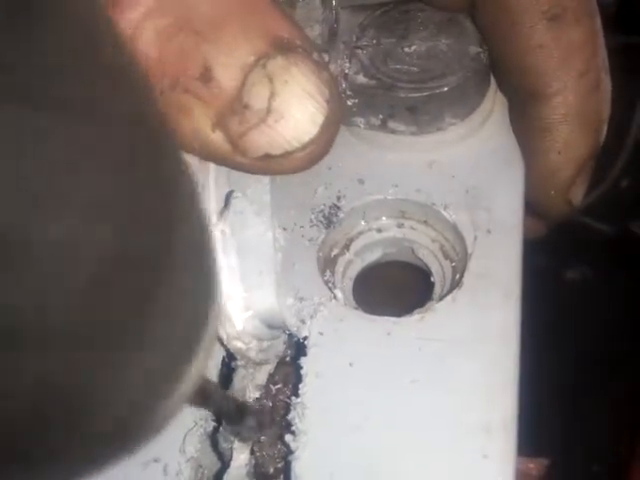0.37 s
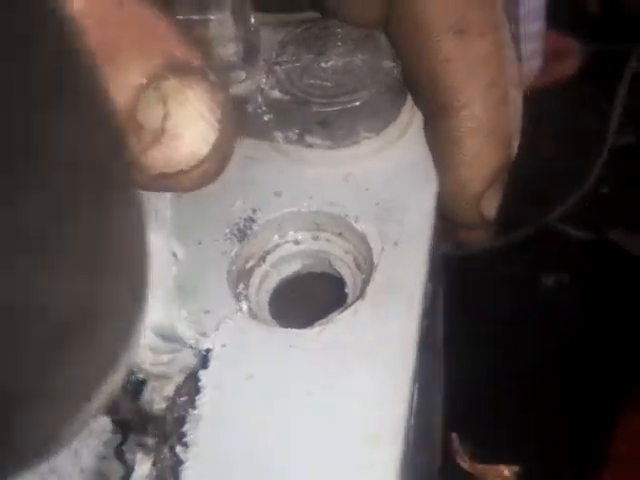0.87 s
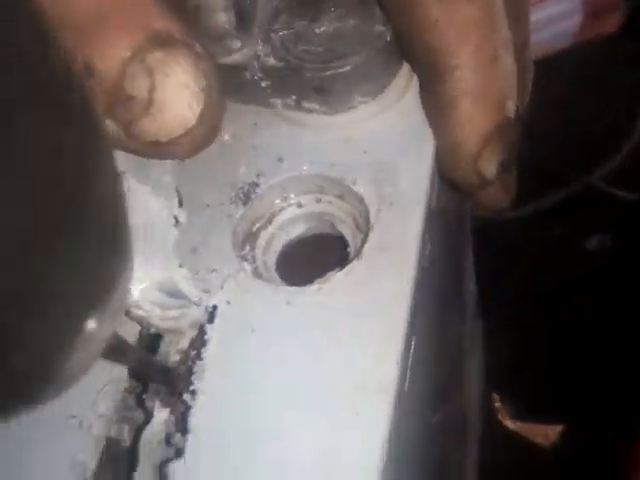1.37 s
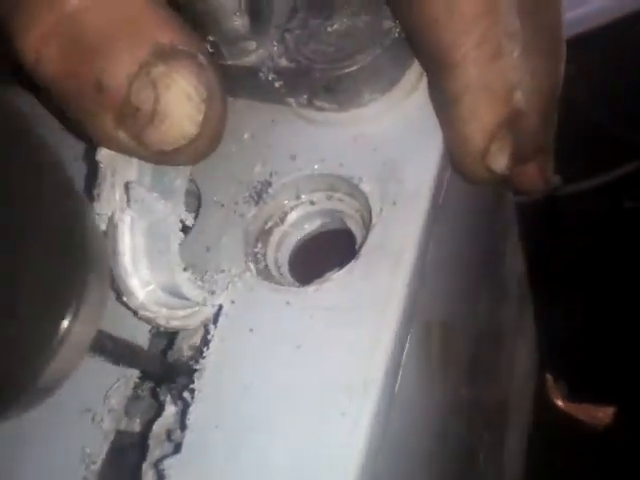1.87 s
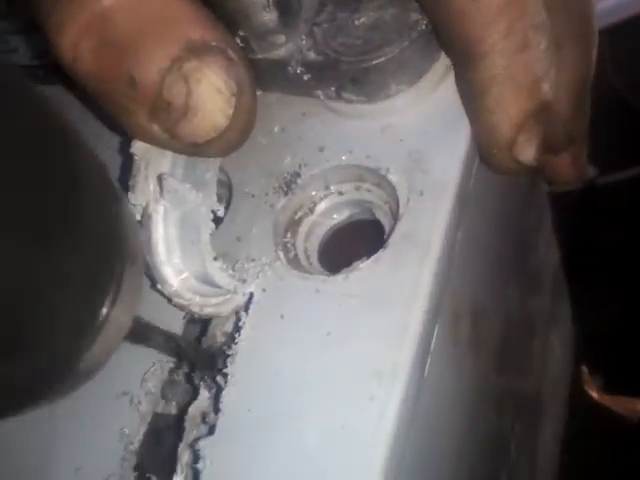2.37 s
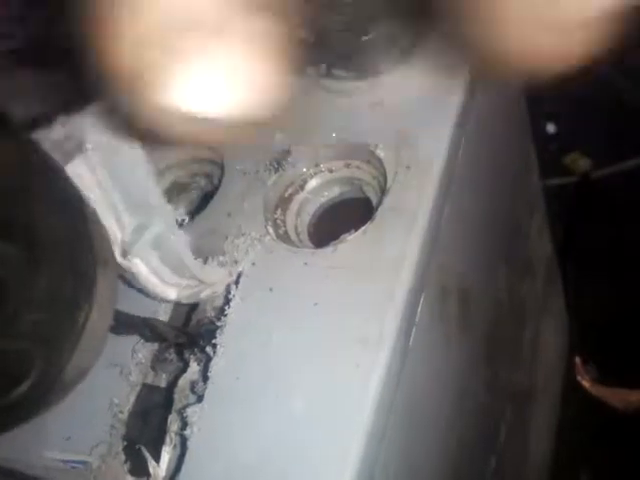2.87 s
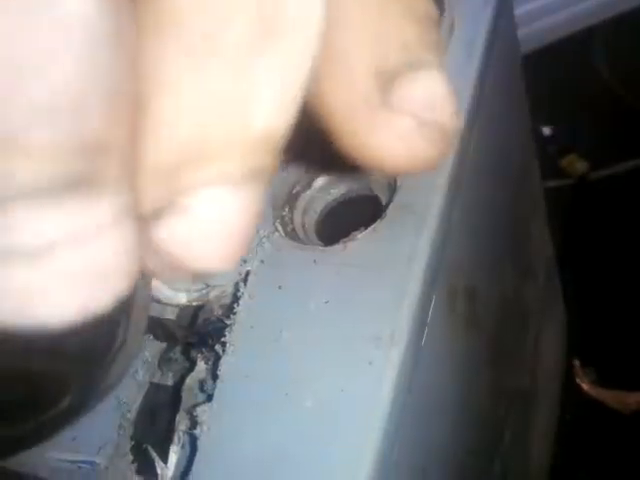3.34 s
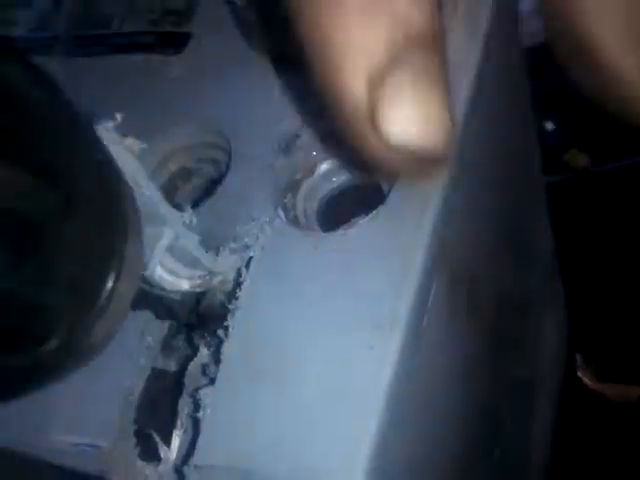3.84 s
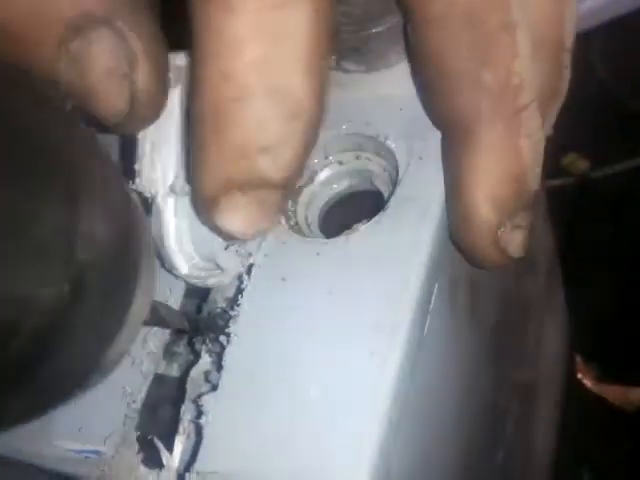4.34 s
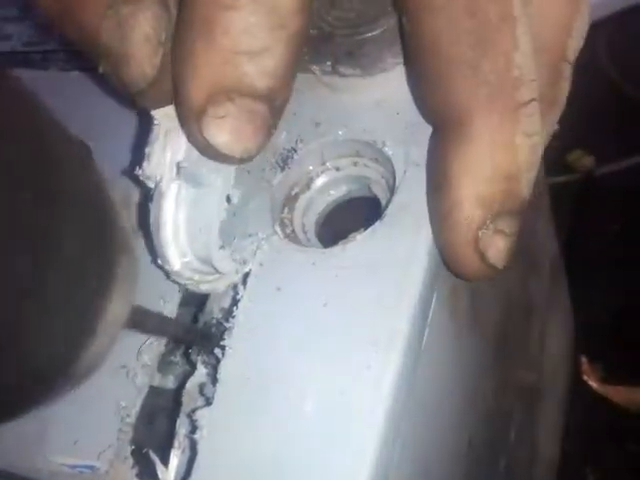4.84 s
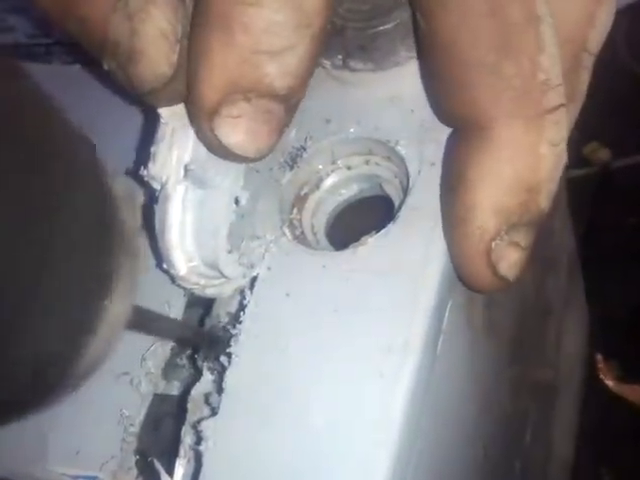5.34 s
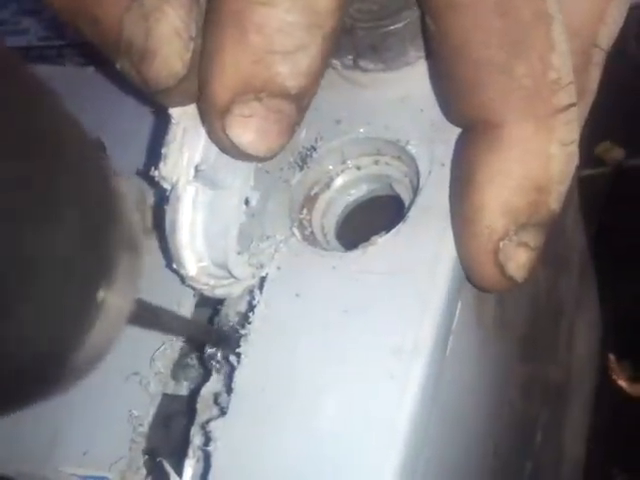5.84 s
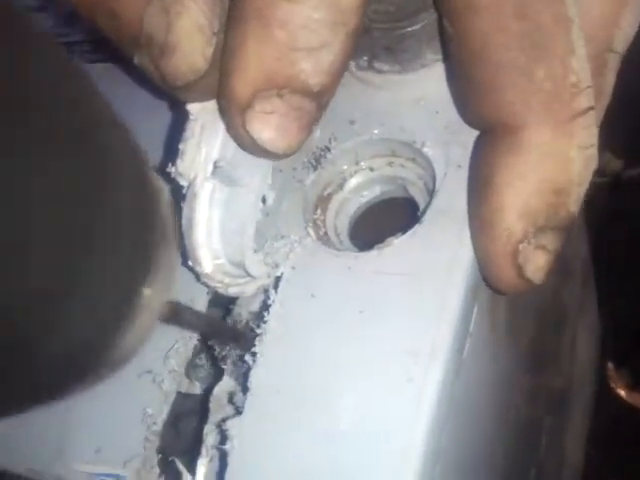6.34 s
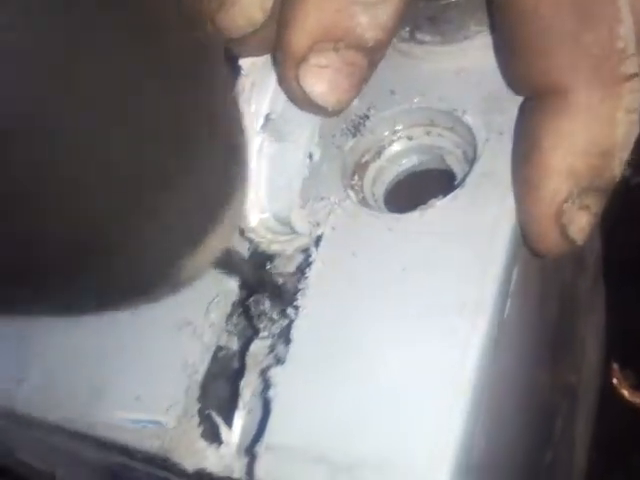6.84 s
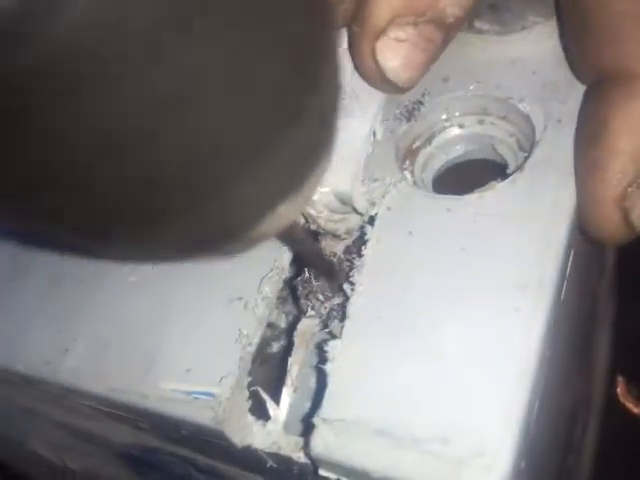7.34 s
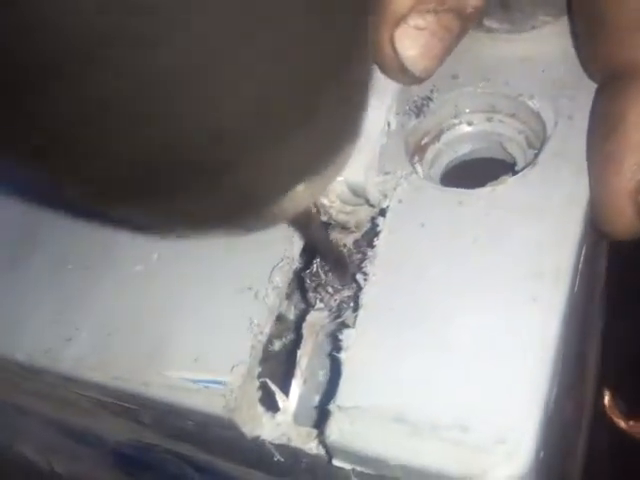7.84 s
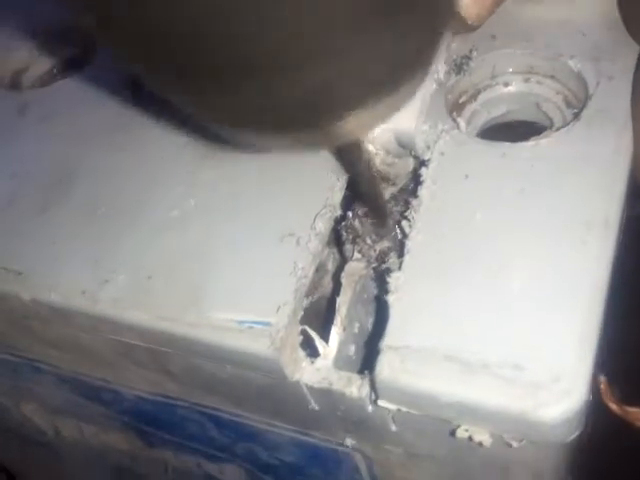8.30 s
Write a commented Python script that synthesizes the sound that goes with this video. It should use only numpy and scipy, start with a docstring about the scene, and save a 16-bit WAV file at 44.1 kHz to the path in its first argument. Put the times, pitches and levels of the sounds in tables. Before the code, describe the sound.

A cordless drill grinds into soft metal at moderate speed, pauses amid clicks and rubbing, bursts briefly, then runs long at full whining speed.

```python
"""A cordless drill bores into soft lead close to a small mono microphone, slowly at first, while a low
shudder of dense thumps arrives three times. In the pause the trigger and case click and rub: struck modes
and grainy noise. A short burst is stopped by the brake, then after more clicks comes a long run at full
speed, leaning ever further over the microphone. Rotor speed drives the drill's tones and noise; its
sound and the handling carry a little room, over a faint steady hiss."""
import sys
import numpy as np
from scipy import signal
from scipy.fft import rfft, irfft, next_fast_len
from scipy.io import wavfile
from scipy.ndimage import uniform_filter1d

SR = 44100
rng = np.random.default_rng(int(sys.argv[2]) if len(sys.argv) > 2 else 0)


def gain_from_db(level_db):
    """Convert decibel levels to linear amplitude factors (20 dB per decade)."""
    decades = np.asarray(level_db, float) / 20
    return 10 ** decades


def unload_audio(sound):
    """Save the sound as a 16-bit wav file, at the path given as the first command line argument."""
    columns = np.transpose(np.atleast_2d(sound))
    # keep every value between -1 and 1, then stretch to whole-number steps
    steps = np.round(np.clip(columns, -1, 1) * 32767)
    wavfile.write(sys.argv[1], SR, steps.astype(np.int16))


N = 383229
SEGMENTS = 15  # commutator whine cycles per shaft turn

# how far the drill leans over the microphone [t/s, lean 0-1]
LEAN = [(6, 0.16), (6.6, 0.27), (7.2, 0.54), (8.69, 0.97)]


def evened(x):
    """Scales to rms 1."""
    return x / np.sqrt(np.mean(x ** 2) + 1e-20)


def read(points, hz):
    """Reads a spectrum on a log-frequency axis."""
    f, value = np.transpose(points)
    return np.interp(np.log(hz + 1), np.log(f + 1), value)


def curves(tables, off):
    """Joins timed tables into full-length columns that hold the value off outside them."""
    t = np.arange(N) / SR
    out = np.full((len(tables[0][0]) - 1, N), float(off))
    for rows in tables:
        s, *columns = np.transpose(rows)
        inside = (t >= s[0]) & (t <= s[-1])
        out[:, inside] = [np.interp(t[inside], s, c) for c in columns]
    return out


def coloured(x, points):
    """Filters by a spectrum table [f/Hz, level/dB]."""
    size = next_fast_len(len(x))
    gain = gain_from_db(read(points, np.fft.rfftfreq(size, 1 / SR)))
    return irfft(rfft(x, size) * gain, size)[:len(x)]


def drift(hz):
    """Slow random wander of rms 1: noise through a one-pole low-pass at hz."""
    knots = rng.standard_normal(N // 64 + 2)
    slow = signal.lfilter([1], [1, -np.exp(-2 * np.pi * hz * 64 / SR)], knots)
    return np.interp(np.arange(N) / 64, np.arange(len(slow)), evened(slow))


def tone(turns, blur_hz):
    """A sine of rms 1 whose phase wanders at random, which widens the line to blur_hz."""
    wander = np.cumsum(rng.standard_normal(N)) * np.sqrt(2 * np.pi * abs(blur_hz) / SR)
    return np.sqrt(2) * np.sin(2 * np.pi * turns + wander)


def drill():
    """The rotor lags behind the trigger; its speed drives every tone, the noise level and its colour."""
    # what the rotor heads for, one table a pull of the trigger [t/s, whine f/Hz]
    pulls = [
        [(0.0, 3850), (0.46, 3808), (1.0, 3792), (1.46, 3686), (1.9, 3700), (2.1, 3660), (2.615, 3715)],
        [(4.007, 5200), (4.215, 5105), (4.435, 3130)],
        [(4.626, 5176), (4.8, 5180), (4.82, 5013), (5.4, 4986), (6.5, 4968), (7.65, 4950), (8.69, 4922)],
    ]
    # pressure on the bit, as roar above its level at that speed [t/s, level/dB]
    load = [(0, 0), (.8, 0.5), (1.2, 1.1), (1.6, 0.2), (2.6, 0.5), (4.2, 0.5), (4.95, -0.8), (5.2, 0.05),
            (5.84, 0.5), (7.14, 0.74), (8.69, 0.5)]
    # noise by speed [whine f/Hz, gearbox roar level/dB, cutting hiss re roar/dB, fan hiss re roar/dB]
    noise_by_speed = [(0, -44, -17.5, -23), (800, -40, -18.5, -19.5), (3960, -36.5, -8.5, -12),
                      (4590, -32.5, -11, -9.5), (4974, -31.5, -9, -9)]
    # the brake bites as each of the first two pulls ends [jolt level/dB, rattle level/dB]
    brakes = [(-43, -51.5), (-23.5, -50)]
    rotor_lag_s = .055  # time constant
    settled_hz = 300  # low-speed tones sound only while the whine is this near its goal
    jolt_rise_s, jolt_db_per_s, rattle_db_per_s = 0.0097, 900, 120
    lean_cut_db, lean_fan_db = 5, -4.5  # leaning shows more of the cut and less of the fan

    t = np.arange(N) / SR
    goal_hz = curves(pulls, 0)[0]
    keep = np.exp(-1 / (rotor_lag_s * SR))
    whine_hz = signal.lfilter([1 - keep], [1, -keep], goal_hz, zi=[keep * goal_hz[0]])[0]
    powered = 1. * (goal_hz > 0)
    shaft_hz = whine_hz / SEGMENTS
    shaft = np.cumsum(shaft_hz) / SR  # turns so far
    fast = powered * np.clip((shaft_hz - 255) / 70, 0, 1)
    settled = np.clip(1 - abs(goal_hz - whine_hz) / settled_hz, 0, 1)

    speeds, *columns = np.transpose(noise_by_speed)
    roar_db, cut_db, fan_db = [np.interp(whine_hz, speeds, c) for c in columns]
    level = powered * gain_from_db(roar_db + curves([load], 0)[0]) + gain_from_db(-88.0)
    for pull, (jolt_db, rattle_db) in zip(pulls, brakes):
        since = t - pull[-1][0]
        fall_db = jolt_db_per_s * np.maximum(since - jolt_rise_s, 0)
        jolt = np.clip(since / jolt_rise_s, .3, 1) * gain_from_db(jolt_db - fall_db)
        rattle = gain_from_db(rattle_db - rattle_db_per_s * abs(since))
        level += (since > 0) * (jolt + rattle)
    lean = fast * np.interp(t, *np.transpose(LEAN))
    cut_db = cut_db + lean_cut_db * lean
    fan_db = fan_db + lean_fan_db * lean
    noise = roar(shaft, fast, 20 * np.log10(level), cut_db, fan_db)
    return motor_tones(shaft, whine_hz, powered, fast, settled) + noise


def motor_tones(shaft, whine_hz, powered, fast, settled):
    """Commutator whine, shaft orders and gear mesh, all locked to the shaft angle."""
    # whine as heard through the housing [f/Hz, level/dB]
    whine_colour = [(800, -62), (1450, -56), (2000, -37.5), (2500, -46), (3200, -50.5), (3850, -34),
                    (4100, -37), (4330, -51), (4650, -38), (4850, -50.5), (5050, -44)]
    # octave of the whine through the housing [f/Hz, level/dB]
    octave_colour = [(6500, -73), (7500, -55.5), (8600, -58.5), (9300, -47), (9900, -52.5), (10200, -54.5)]
    # the drill turns towards and away from the microphone [t/s, whine level/dB, octave level/dB]
    facing = [(0, -8.5, -1), (.46, -4, 1), (.79, -9.5, -1.5), (1.01, -3.5, 2), (1.9, -5.5, 2.5),
              (2.6, -10.5, -1), (4.0, -0.5, 4.5), (4.8, -1, 4), (5.1, 5, -5), (5.75, -1.5, 6),
              (6.25, 0.5, 3.5), (6.5, 9, 7.5), (7.3, 9, -6), (8.1, 7, -6), (8.69, -8, 0.5)]
    # tones locked to the shaft [multiple of shaft speed]
    multiples = [1, 1.349, 5, 10, 12, 14, 17, 24, 26, 39]
    # one row for each of those tones [low-speed level/dB, full-speed level/dB, blur f/Hz]
    shaft_tones = [(-61.5, -50.5, .8), (-71, -52.5, 1.2), (-42.5, -81, 7.6), (-82, -54.5, 20),
                   (-77, -54.5, 7.6), (-51, -51.5, 12), (-70, -52.5, 60), (-66, -53, 7.7), (-76, -64, 6.6),
                   (-80, -66, 27)]
    # gear mesh, a base for all its harmonics [t/s, level/dB]
    gears = [(0, -57.5), (1.2, -56), (2.6, -60), (4.0, -70), (4.45, -72), (4.9, -50.5), (5.5, -49),
             (7.5, -51), (8.69, -62)]
    # harmonics of the mesh from the first up [level re that base/dB]
    mesh_harmonics = [-34.5, -3, -1.5, 3, -5.5, -9, -18]
    mesh = 2.8  # gear mesh cycles per shaft turn

    whine_db, octave_db = curves([facing], 0)
    whine_db = read(whine_colour, whine_hz) + whine_db + 0.76 * drift(19)
    octave_db = read(octave_colour, 2 * whine_hz) + octave_db + 0.87 * drift(17)
    out = gain_from_db(whine_db) * tone(SEGMENTS * shaft, 4.57)
    out += gain_from_db(octave_db) * tone(2 * SEGMENTS * shaft, 25)
    out *= uniform_filter1d(powered, 400)

    # the other tones emerge once the rotor is up to speed
    run = uniform_filter1d(powered * np.clip((whine_hz / SEGMENTS - 205) / 35, 0, 1), 400)
    run *= np.maximum(fast, settled)
    for k, (slow_db, fast_db, blur_hz) in zip(multiples, shaft_tones):
        level_db = slow_db + fast ** 2 * (fast_db - slow_db)
        out += run * gain_from_db(level_db + drift(2.4)) * tone(k * shaft, blur_hz)
    gears_db = curves([gears], -120)[0]
    for k, db in enumerate(mesh_harmonics, 1):
        out += run * gain_from_db(gears_db + db + 4.0 * drift(20)) * tone(k * mesh * shaft, 6 * k)
    return out


def roar(shaft, fast, roar_db, cut_db, fan_db):
    """Dense uneven knocks of gears and chips ring the housing; the chuck's wobble throbs through them."""
    # noise colour at low speed [f/Hz, level/dB]
    slow_colour = [(35, -75), (60, -42), (211, -23), (242, -27.5), (285, -13), (628, -11.5), (1260, -0.5),
                   (2590, -9), (3120, -7.5), (3760, -7.5), (5090, -10.5), (5720, -9.5), (11200, -26),
                   (12900, -19.5), (15500, -25.5)]
    # noise colour at full speed [f/Hz, level/dB]
    fast_colour = [(35, -75), (60, -29), (285, -41), (327, -12.5), (376, -22), (443, -12), (689, -17.5),
                   (1420, -2.5), (2650, -12.5), (4860, -9.5), (7050, -16.5), (9760, -24.5), (11000, -40.5),
                   (12900, -30), (15500, -36)]
    # full speed with the drill leaning over the microphone [f/Hz, level/dB]
    tilted_colour = [(35, -75), (60, -35), (292, -25), (327, 6.5), (376, -42), (443, -7), (599, -13.5),
                     (1420, -1), (1670, -4.5), (2590, -11.5), (4860, -11), (6570, -10), (8680, -29),
                     (12600, -25), (15500, -36)]
    # resonances and notches of the housing [f/Hz, width f/Hz, level/dB]
    casing = [(903, 520, 7.5), (1417, 121, 8.5), (2450, 1050, 5.5), (2690, 240, -5), (3090, 78, -3.5),
              (3900, 240, 1.5), (4430, 380, -0.5), (4860, 99, -1), (5180, 242, -5.5), (5820, 500, 2.5),
              (6580, 120, 2.5), (9400, 303, 0), (10030, 300, 3.5), (13100, 250, 0)]

    chuck = 2 * np.pi * .0667 * shaft  # chuck turns per shaft turn
    throb = 1 + 0.039 * np.cos(chuck) + 0.04 * np.cos(2 * chuck + 0.86) + 0.05 * np.cos(5 * chuck)
    throb += 0.021 * np.cos(2 * np.pi * shaft)
    knock_db = 2.56 * np.minimum(rng.exponential(1, N), 3.5) + 0.56 * drift(60)
    knocks = rng.standard_normal(N) * gain_from_db(knock_db)
    hz, s, z = signal.stft(knocks * throb, SR, nperseg=512, noverlap=384)
    at = np.minimum((s * SR).astype(int), N - 1)

    lean = np.clip(np.interp(s, *np.transpose(LEAN)), 0, 1)
    full_db = np.outer(read(fast_colour, hz), 1 - lean) + np.outer(read(tilted_colour, hz), lean)
    colour_db = read(slow_colour, hz)[:, None] * (1 - fast[at]) + full_db * fast[at]
    colour_db += sum(db / (1 + (2 * (hz - f) / w) ** 2) for f, w, db in casing)[:, None]
    # patches a few bins wide and some frames long swell and fade at random
    patches = uniform_filter1d(rng.standard_normal(z.shape), 5, 0)
    patches = evened(uniform_filter1d(patches, 20, 1))
    z *= gain_from_db(colour_db + 0.5 * patches)

    # steer the smoothed power of three bands to their levels
    cut = np.clip(np.log(hz / 2600 + 1e-9) / np.log(5200 / 2600), 0, 1)  # share of cutting and fan hiss
    fan = np.clip((hz - 7000) / 1200, 0, 1)  # share of the fan hiss
    power = uniform_filter1d(abs(z) ** 2, 120, 1)
    levels = []
    for lo, hi, db in ((900, 2600, roar_db), (5200, 7200, roar_db + cut_db), (7800, 15000, roar_db + fan_db)):
        band_power = power[(hz > lo) & (hz < hi)].sum(0) * 4 / 3  # one-sided Hann bins to mean square
        levels.append(db[at] - 10 * np.log10(band_power))
    gain_db = np.outer(1 - cut, levels[0]) + np.outer(cut - fan, levels[1]) + np.outer(fan, levels[2])
    z *= gain_from_db(gain_db - 1.0)
    return signal.istft(z, SR, nperseg=512, noverlap=384)[1][:N]


def handling():
    """Each click is a few ms of crackle into the modes of the tool body; rubs are grainy noise near 1.3 kHz."""
    # clicks of trigger, brake and fingers [t/s, peak level before the body's colour/dB, brightness/dB,
    # favoured f/Hz]
    clicks = [(2.65, -38.5, -4, 6350), (2.67, -44, -16, 2120), (2.709, -43, -11, 1360),
              (2.74, -50, -5, 1290), (2.985, -50, -19, 918), (2.991, -45, -20, 1060),
              (2.996, -37, -18, 1380), (3.029, -44, -20, 1380), (3.04, -51, -19, 1220),
              (3.289, -48, -25, 1560), (3.334, -44, -11, 2460), (3.409, -29.5, -8, 1380),
              (3.411, -37, -22, 918), (3.416, -42, -12, 918), (3.499, -26, -15, 1590),
              (3.876, -45, -33, 1190), (3.932, -51, -20, 1380), (3.956, -53, -11, 856),
              (3.967, -43, -14, 856), (3.978, -47, -8, 875), (3.987, -35, -12, 904),
              (3.995, -37, -14, 4910), (4.013, -27, -20, 905), (4.439, -18.5, -8, 1380),
              (4.449, -19, -17, 1440), (4.593, -34, -19, 2010), (4.619, -29.5, -12, 880),
              (4.629, -33.5, -1, 1430), (4.891, -25.5, -24, 1380)]
    # modes of the tool body [f/Hz, level/dB, t60 t/s]
    plastic = [(918, -10, 0.03), (1060, 0, 0.021), (1380, -5.5, 0.011), (1600, -1.5, 0.016),
               (2120, -3, 0.0074), (2600, -6, 0.005), (3900, -10, 0.0061), (4910, -3, 0.0064),
               (6350, -5, 0.0054), (7600, -3.5, 0.0099), (8600, -8, .006)]
    # fingers sliding on the case [loudest t/s, level/dB, rise t/s, fall t/s]
    rubs = [(2.74, -58, .03, 0.081), (2.84, -69, .02, 0.27), (3.05, -60, .01, 0.02),
            (3.14, -61.5, .07, .06), (3.37, -69, .03, 0.037), (3.44, -69, .02, .06), (3.52, -65, .01, 0.13),
            (3.99, -53, 0.072, 0.042)]
    contact_s, focus_db = .0015, 17
    rub_range_db = 16.5  # a slide changes by this much over its rise or fall time

    out = np.zeros(N + SR)
    t = np.arange(3000) / SR
    u = t / contact_s
    for s, db, bright_db, main_hz in clicks:
        crack = rng.standard_normal(3000) * u * np.exp(-u)
        ring = np.zeros(3000)
        for hz, mode_db, t60 in plastic:
            # harder contact excites the high modes
            mode_db += (8.5 + bright_db) * np.clip(np.log2(hz / 2200), 0, 1)
            # the struck spot favours one mode
            mode_db += focus_db / (1 + (9 * np.log2(hz / main_hz)) ** 2)
            ring += gain_from_db(mode_db - 60 * t / t60) * np.sin(2 * np.pi * hz * t) * np.sqrt(.01 / t60)
        clean_blow = np.arange(3000) == round(contact_s * SR)
        blow = 0.5 * crack / np.linalg.norm(crack) + clean_blow
        click = evened(signal.fftconvolve(blow, ring)[:3000])
        click = click + gain_from_db(5.5 + bright_db) * evened(crack)
        out[round(s * SR):][:3000] += gain_from_db(db) * click / abs(click).max()
    # a small body radiates no bass
    out = coloured(out, [(25, -60), (400, -25), (850, 3.5), (10500, 4.0), (13000, -24.5)])

    grains = rng.standard_normal(N) * gain_from_db(2.7 * drift(80))
    rub = evened(coloured(grains, [(400, -36), (800, -7.0), (1300, 2.0), (1900, -9), (2500, -19.0),
                                   (3200, -27.5)]))
    t = np.arange(N) / SR
    slides = np.zeros(N)
    for s, db, rise, fall in rubs:
        slides += gain_from_db(db - rub_range_db * np.maximum((s - t) / rise, (t - s) / fall))
    return out[:N] + slides * rub


def shudder():
    """Dense irregular thumps in lumps; the second and third shudders open abruptly with a harder blow."""
    # low shudders [start t/s, length t/s, start level/dB, end level/dB]
    shudders = [(0.0, 0.0762, -33.5, -29), (0.667, 0.413, -30.5, -29.5), (1.119, 0.02, -26.5, -25)]
    # colour of the thumps [f/Hz, level/dB]
    shudder_colour = [(25, -27), (64, -23), (142, -3.5), (250, 3), (400, -5), (520, 3), (700, 2.5),
                      (900, -7.5), (1400, -0.5), (1900, -15), (2450, -13), (2800, -38), (5000, -94)]
    blow_db, fade_db_per_s = 11, 1900
    kick_db, kick_s = 2, .012  # extra level at the start and its time constant

    thump_db = 2.2 * np.minimum(rng.exponential(1, N), 1.8) + 2.4 * drift(25)
    thumps = (rng.random(N) < 1300 / SR) * gain_from_db(thump_db)  # 1300 a second on average
    thumps *= np.where(rng.random(N) < .55, -1, 1)
    t, level = np.arange(N) / SR, np.zeros(N)
    for start, length, start_db, end_db in shudders:
        if start > .01:  # the first is already under way
            thumps[round((start + .002) * SR):][:48] -= gain_from_db(blow_db) * np.hanning(48) / 12
        held_db = np.interp(t, [start, start + length], [start_db, end_db])
        held_db += kick_db * np.exp(-abs(t - start) / kick_s)
        fade_db = fade_db_per_s * np.maximum(t - start - length, 0)
        level += (t >= start) * gain_from_db(held_db - fade_db)
    body = evened(coloured(thumps + 0.18 * rng.standard_normal(N), shudder_colour))
    return uniform_filter1d(level, 60) * body


def room(x):
    """Reverberation from sparse taps of random sign, each band dying at its own speed."""
    # decay of the room [f/Hz, t60 t/s]
    decay = [(300, 0.196), (800, 0.91), (1400, 0.35), (2500, 0.38), (3700, 0.39), (6000, 0.67),
             (10000, 0.13)]
    taps = np.zeros(SR // 2)
    at = np.arange(300, SR // 2 - 20, 20)
    taps[at + rng.integers(0, 20, len(at))] = rng.choice([-1., 1.], len(at))
    hz, t, z = signal.stft(taps, SR, nperseg=256)
    z = z * gain_from_db(-60 * t / read(decay, hz)[:, None])
    tail = signal.istft(z, SR, nperseg=256)[1]
    return signal.fftconvolve(x, tail / np.linalg.norm(tail))[:N]


def background():
    """Faint steady hiss, coloured noise, with two narrow bands made of phase-blurred tones."""
    # colour of the hiss [f/Hz, level/dB]
    air = [(15, -40.5), (25, 2), (75, -20), (104, 1), (152, -2), (369, 2), (411, -1.5), (1030, -3.5),
           (2300, -7), (5740, -9), (6560, -3.5), (7310, 0), (9830, -3), (10900, -10), (15500, -8)]
    # narrow bands [f/Hz, width f/Hz, level/dB]
    air_bands = [(6440, 57, -82.5), (9880, 150, -81.5)]
    t = np.arange(N) / SR
    bands = sum(gain_from_db(db) * tone(hz * t, w) for hz, w, db in air_bands)
    hiss = gain_from_db(-70) * evened(coloured(rng.standard_normal(N), air))
    return hiss + bands


def scene():
    """Drill and handling in the room through a gentle bass cut at the microphone; shudder and hiss without it."""
    near = drill() + handling()
    in_room = near + gain_from_db(-17.5) * room(near)
    heard = coloured(in_room, [(25, -10.5), (100, -3), (250, -2.0), (15000, 0.5)])
    mono = heard + shudder() + background()
    return np.array([mono, mono])


def roll_off(x):
    """The treble ends steeply here."""
    return signal.sosfilt(signal.butter(12, 15680, fs=SR, output="sos"), x)


def record(dry):
    """Takes the finished mix from the microphone to the file's sound."""
    return roll_off(dry)


dry = scene()
out = record(dry)
unload_audio(out)
```